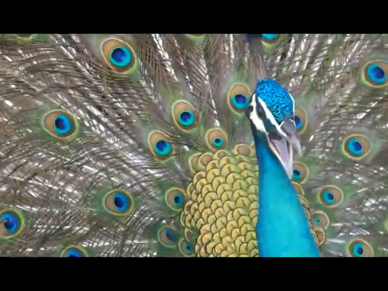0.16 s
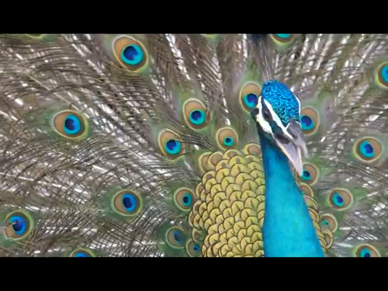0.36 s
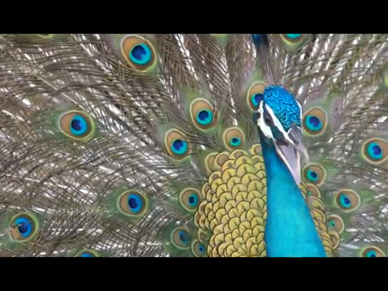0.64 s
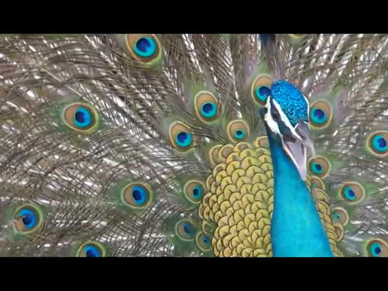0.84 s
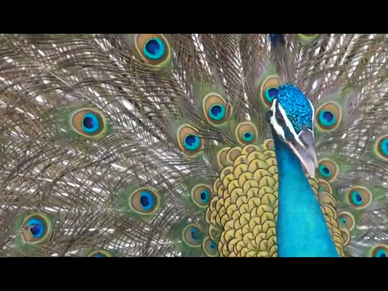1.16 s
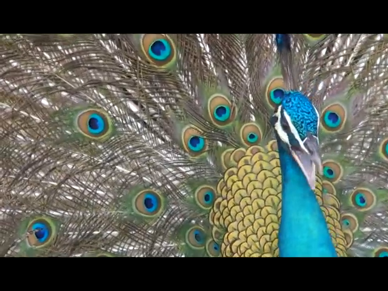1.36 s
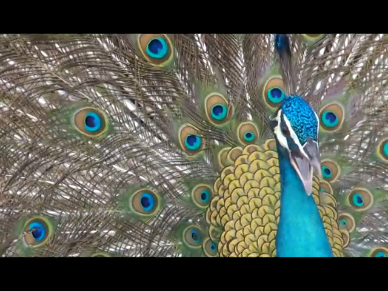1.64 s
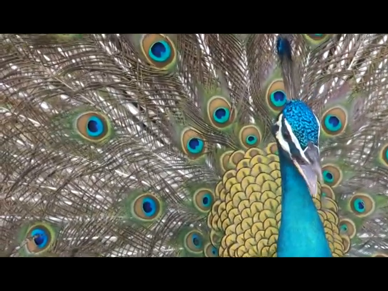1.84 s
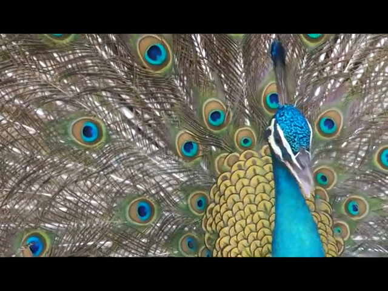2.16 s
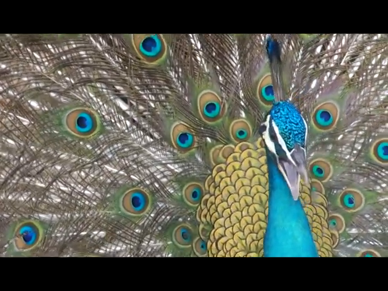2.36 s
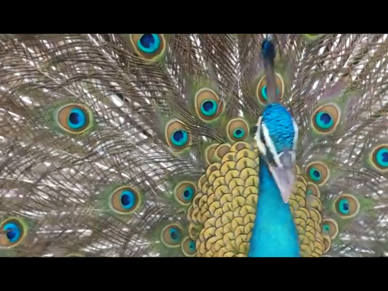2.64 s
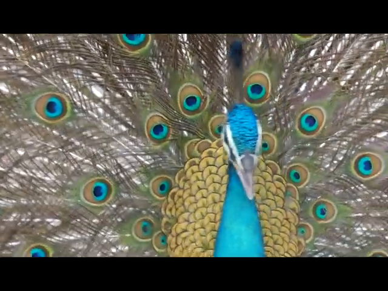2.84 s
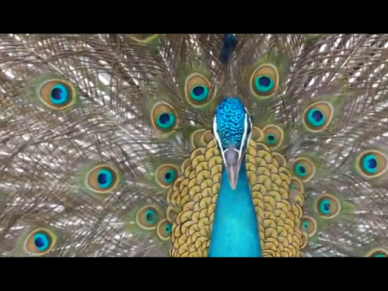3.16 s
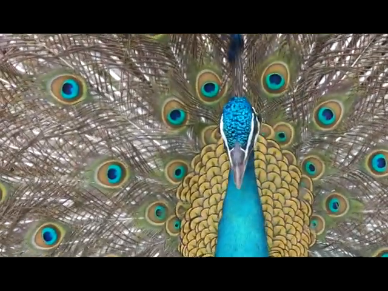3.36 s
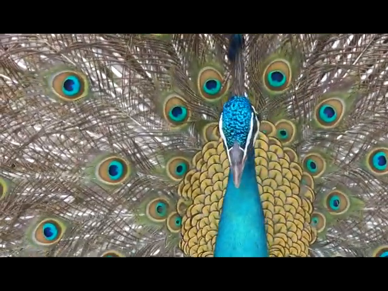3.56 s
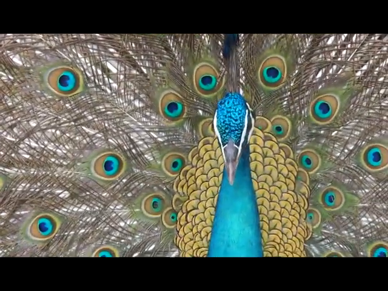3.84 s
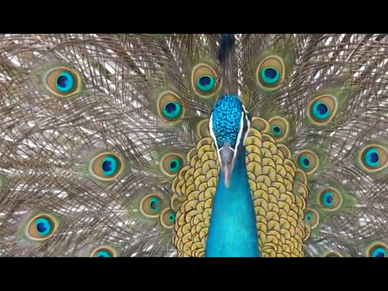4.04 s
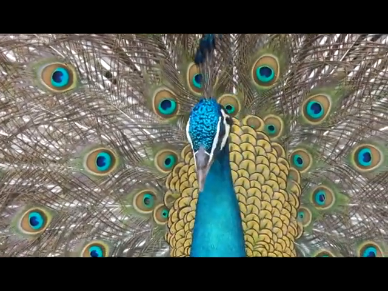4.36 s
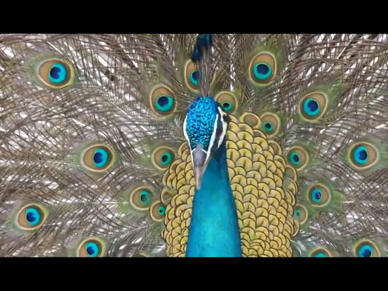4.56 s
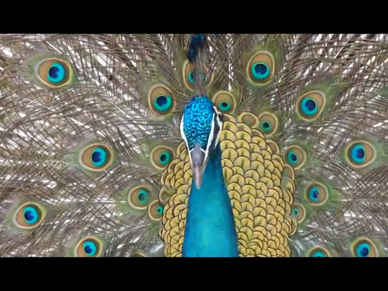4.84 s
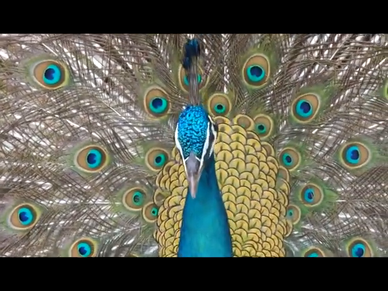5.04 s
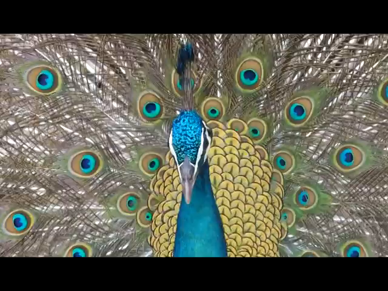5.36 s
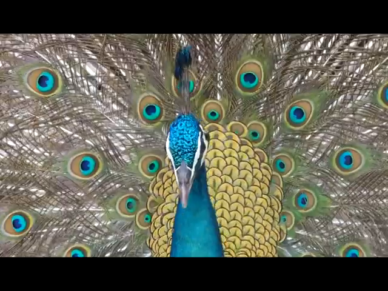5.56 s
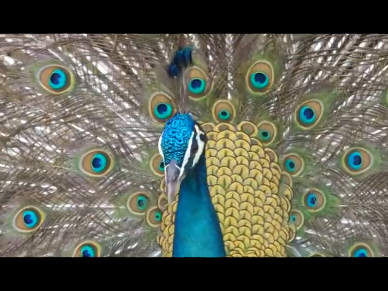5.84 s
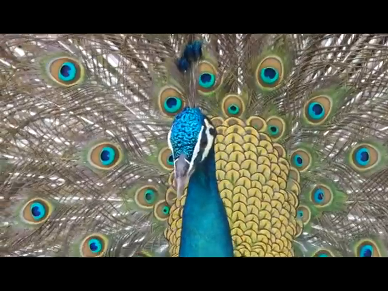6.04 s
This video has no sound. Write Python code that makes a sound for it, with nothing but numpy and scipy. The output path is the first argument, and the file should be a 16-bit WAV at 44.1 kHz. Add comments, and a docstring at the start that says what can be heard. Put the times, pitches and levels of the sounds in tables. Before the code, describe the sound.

Four piercing rising-and-sagging peacock cries at close range, followed by swelling background hiss, low wind rumble and scattered dry clicks.

```python
"""A displaying peacock gives four loud arching calls close to a camera in a covered aviary.
Each call is a stack of gliding overtones plus puffs of noise; a thin whistle leads into the last one.
A few dry clicks of decaying noise follow. Lumpy low noise is air buffeting the microphone, over a steady hiss.
The camera's gain control pushes the background down while he calls and lets it swell back afterwards."""
import sys
import numpy as np
from scipy import signal
from scipy.fft import rfft, irfft
from scipy.io import wavfile
from scipy.ndimage import uniform_filter1d, minimum_filter1d

SR = 44100
rng = np.random.default_rng(int(sys.argv[2]) if len(sys.argv) > 2 else 0)


def store_pcm(level_fs):
    """Save levels as 16-bit WAV."""
    pcm = np.round(np.clip(level_fs, -1, 1) * 32767).astype(np.int16)
    wavfile.write(sys.argv[1], SR, np.atleast_2d(pcm).T)


N = 273420
TIME = np.arange(N) / SR  # s
BINS = np.fft.rfftfreq(N, 1 / SR)  # Hz


def amp(db):
    """Turns decibels into a gain."""
    return 10 ** (np.asarray(db) / 20)


def unit(x):
    """Scales a sound to an average (rms) level of 1."""
    return x / np.sqrt(np.mean(x ** 2) + 1e-20)


def read(points, hz):
    """Reads a spectrum curve, with frequency on a log axis."""
    f, value = np.transpose(points)
    return np.interp(np.log(hz + 1), np.log(f + 1), value)


def follow(rows, t):
    """Reads every column of a curve at the positions t."""
    s, *columns = np.transpose(rows)
    return [np.interp(t, s, c) for c in columns]


def add(mix, s, sound):
    """Lays a sound into the mix at s seconds."""
    part = mix[max(round(s * SR), 0):][:len(sound)]
    part += sound[:len(part)]


def wander(size, rate_hz):
    """Slow random drift of rms 1, with most of its motion below about rate_hz."""
    span = max(size, 2 * SR)
    hz = np.fft.rfftfreq(span, 1 / SR)
    slow = rfft(rng.standard_normal(span)) / (1 + (hz / rate_hz) ** 2)
    return unit(irfft(slow, span))[:size]


def band(x, low_hz, high_hz):
    """Keeps one band of a sound, at rms 1."""
    sos = signal.butter(2, [low_hz, high_hz], "band", fs=SR, output="sos")
    return unit(signal.sosfilt(sos, x))


def ports(spectra, phase, balance):
    """Gives spectra the phase and level differences between the two microphone ports."""
    lean = amp(read(balance, BINS) / 2)
    turn = np.exp(1j * read(phase, BINS) / 2)
    gains = np.array([lean * turn, turn.conj() / lean])
    even_power = np.sqrt((lean ** 2 + lean ** -2) / 2)
    return irfft(spectra * gains / even_power, N)


def peacock():
    """The bird's voice: four calls in a row, and the thin whistle before the last."""
    # the calls: (start [s], length [s], top pitch [Hz], downward drift over the call [Hz], level [dB],
    # extra ring near the top [dB], treble lost as the beak shuts [dB])
    cries = [(-0.085, 0.525, 653, -4, -0.5, 15.5, -1), (0.638, 0.4838, 652.6, 0, -0.5, 7, -1),
             (1.374, 0.5576, 656.4, -5, -0.06, -0.5, 1.5), (2.225, 0.628, 658.1, 16, -0.15, -1.5, 18.5)]
    out = np.zeros(N)
    for cry in cries:
        add(out, *call(*cry))
    add(out, *whistle())
    return out


def call(start, length, top_hz, drift_hz, call_db, extra_ring_db, shut_db, jitter=0.00071, waver=0.00068,
         rasp_jitter=0.016, rasp_below_hz=582, droop_hz=42, shimmer_db=3.5, flutter_db=0.58,
         attack=.014, release=0.015, partials=20):
    """One cry: overtones arch through the throat's peaks and turn hoarse at both ends, where the pitch sags."""
    # a quick climb and a long sag, shared by all calls: (share of the call [0-1], drop below the top pitch [Hz])
    arch = [(0, 111.5), (.025, 77), (.08, 46.5), (.17, 18.5), (.27, 4.5), (.4, -1.5), (.53, 4), (.63, 19.5),
            (.88, 55), (.96, 75), (1, 100)]
    # he pushes hardest on the climb and eases off at the end: (share of the call [0-1], level [dB])
    effort = [(0, 4), (.03, 3.5), (.11, 2), (.22, 1.5), (.4, 0), (.88, -0.5), (.96, -4.5), (1, -2.5)]
    # weak overtones: (share of the call [0-1], hollow near 4 kHz [dB], ring near 6.5 kHz [dB], sheen above [dB])
    overtones = [(0, -39.5, -28.5, -40.5), (.06, -32.5, -35.5, -37.5), (.17, -29.5, -28.5, -34.5),
                 (.27, -32, -30.5, -28), (.47, -36, -35, -28.5), (.6, -35, -38.5, -32.5),
                 (.69, -32.5, -40, -42), (.82, -34.5, -33.5, -31.5), (.95, -42, -37.5, -36),
                 (1, -47, -36, -43)]
    # fixed peaks and dips of the throat and its surroundings: (frequency [Hz], amplitude [dB])
    throat = [(550, -25), (603, -19), (635, -24), (660, -21.5), (1120, -18), (1225, -13.5), (1275, -17),
              (1315, -25.5), (1640, -22), (1735, -19), (1805, -23), (1832, -31), (1868, -17), (1893, -12),
              (1919, -16.5), (1942, -11), (1975, -9), (2230, -16), (2350, -17.5), (2420, -10.5),
              (2495, -14.5), (2555, -33), (2620, -27)]
    top_at = .4  # share of the call at which the drift is zero
    ring_at, ring_span = 0.36, 0.23  # where the extra ring peaks and how far it spreads, shares of the call
    shut_at, shut_span = 0.782, 0.16  # when the beak starts to shut and how long it takes, shares of the call

    t = np.arange(max(start - attack, 0), start + length + release, 1 / SR)
    share = (t - start) / length
    hz = top_hz - follow(arch, share)[0] - drift_hz * (share - top_at)
    hz = hz * (1 + waver * wander(len(t), 40))
    ending = np.clip((t - start - length + release) / (2 * release), 0, 1)
    hz = hz - droop_hz * ending  # the pressure collapses

    # the four strong partials swell and fade as they glide through the throat's peaks
    effort_db, = follow(effort, share)
    muffle_db = shut_db * np.clip((share - shut_at) / shut_span, 0, 1)
    strong_db = [read(throat, k * hz) + effort_db for k in range(1, 4)]
    strong_db.append(read(throat, 4 * hz) - muffle_db)

    hollow_db, ring_db, sheen_db = follow(overtones, share)
    hollow_db, sheen_db = hollow_db - muffle_db, sheen_db - muffle_db
    ringing_db = extra_ring_db * np.exp(-((share - ring_at) / ring_span) ** 2)
    ring_db = ring_db + ringing_db

    # a low pitch is slack, and a lower one still is hoarse; both make the pitch shake
    hoarse = 1 / (1 + np.exp((hz - rasp_below_hz) / 9))
    slack = np.clip((650 - hz) / 40, 0, 1)
    wobble = jitter * (1 + slack) * wander(len(t), 160) + rasp_jitter * hoarse * wander(len(t), 310)
    phase = 2 * np.pi * np.cumsum(hz * (1 + wobble)) / SR

    out = np.zeros(len(t))
    for k in range(1, partials + 1):
        if k <= len(strong_db):
            level_db = strong_db[k - 1] + flutter_db * wander(len(t), 26)
        else:
            level_db = overtone_level(k * hz, hollow_db, ring_db, sheen_db)
            level_db = level_db + shimmer_db * wander(len(t), 18) - 4 * hoarse  # hoarseness weakens them
        out += amp(level_db) * np.cos(k * phase + rng.uniform(0, 2 * np.pi))
    out += rush(t - start, phase, slack, hoarse, hollow_db, ring_db, sheen_db, ringing_db, strong_db[3])

    fade_in = np.clip((t - t[0]) / (max(start, .004) - t[0]), 0, 1)
    fade_out = np.clip((t[-1] - t) / (2 * release), 0, 1)
    return t[0], amp(call_db) * out * (fade_in * fade_out) ** 2


def overtone_level(f, hollow_db, ring_db, sheen_db):
    """Weak overtones pass through three zones as they rise: the hollow, the ring, then the sheen."""
    # weights within each zone, all three tables: (frequency [Hz], weight [dB])
    hollow_weight, ring_weight, sheen_weight = [(2750, 8.5), (3050, -4.5), (3300, -2), (3700, -10.5),
                                                (4300, -9.5), (4600, -15.5), (5000, -11)], [(5000, 21), (5250, -12), (5550, -8),
                                                                (5880, -2.5), (6400, -13), (7150, -9.5),
                                                                (7600, -13)], [(7600, -12), (8500, -10),
                                                                              (9200, -12.5), (9800, -15),
                                                                              (10450, -13), (11100, -26),
                                                                              (11700, -51)]
    in_ring = np.clip((f - 4900) / 400, 0, 1)
    in_sheen = np.clip((f - 7400) / 400, 0, 1)
    level_db = (1 - in_ring) * (hollow_db + read(hollow_weight, f)) + in_ring * (ring_db + read(ring_weight, f))
    return (1 - in_sheen) * level_db + in_sheen * (sheen_db + read(sheen_weight, f))


def rush(since_start, phase, slack, hoarse, hollow_db, ring_db, sheen_db, ringing_db, fourth_db,
         rush_db=-16.5, rush_rise_db=3, grate_db=7, grate_s=.055, hollow_rush_db=-15, rasp_db=-16):
    """Air rushes through the beak in puffs, once a cycle, least at the taut top of the call."""
    puffs = (1 + 0.4 * np.cos(phase)) * rng.standard_normal(len(phase))
    onset_db = grate_db * np.exp(-np.maximum(since_start, 0) / grate_s)  # the onset grates
    loose_db = rush_rise_db * slack + 5 * hoarse + onset_db
    out = amp((ring_db + sheen_db) / 2 + rush_db + loose_db) * band(puffs, 5000, 10000)
    out += amp(hollow_db + hollow_rush_db + loose_db + .5 * ringing_db) * band(puffs, 2700, 4330)
    out += amp(fourth_db + rasp_db) * hoarse * band(puffs, 1490, 2780)
    return out


def whistle():
    """A thin whistle leads into the last call: one sine with a gliding pitch."""
    # its path, level before the bird's closeness gain: (time [s], pitch [Hz], amplitude [dB])
    path = [(2.111, 1690, -51.5), (2.135, 1650, -52), (2.16, 1610, -45), (2.194, 1644, -49),
            (2.215, 1640, -44), (2.225, 1650, -58)]
    t = np.arange(path[0][0], path[-1][0], 1 / SR)
    hz, db = follow(path, t)
    return t[0], amp(db) * np.sin(2 * np.pi * np.cumsum(hz) / SR)


def scatter(x, first, decay, above_hz, size=4096):
    """A quick spray of echoes from nearby things, different at each port, above a given frequency."""
    t = TIME[:size]
    taps = rng.standard_normal((2, size)) * (t > first) * np.exp(-t / decay)
    high = signal.butter(3, above_hz, "high", fs=SR, output="sos")
    taps = signal.sosfilt(high, taps / np.linalg.norm(taps[0]))
    return signal.fftconvolve(x[None], taps, axes=1)[:, :N]


def clicks(snap=0.45, size=4096):
    """Each dry click is a sharp snap followed by a quickly dying crackle."""
    # the clicks, level before an overall 3 dB lift:
    # (time [s], level [dB], decay time [s], treble tilt [dB per octave])
    click_rows = [(4.448, -38, 0.0065, 4), (4.6694, -26.5, 0.0033, 1), (4.6724, -23.5, 0.005, 1.5),
                  (4.7945, -20.5, 0.0078, -0.5), (4.798, -30, 0.0044, 3), (4.93, -34, 0.011, 1.5),
                  (5.114, -34, .005, 9), (5.504, -23, 0.013, 1), (5.528, -37.5, 0.049, 3)]
    # shared tone of the clicks: (frequency [Hz], density [dB per Hz])
    click_tone = [(300, -40), (800, 4.5), (1300, 1), (2200, 6.5), (2600, -3), (3200, -15), (4600, -14.5),
                  (6500, -5.5), (9000, -10.5), (11500, -24)]
    out, t, hz = np.zeros(N), np.arange(size) / SR, np.fft.rfftfreq(size, 1 / SR)
    lead = size // 16  # the snap sits a little way in
    for s, db, length, tilt_db in click_rows:
        colour = unit(amp(read(click_tone, hz) + tilt_db * np.log2((hz + 100) / 3000)))
        crackle = rng.standard_normal(size) * np.exp(-t / length)
        crackle[0] += snap * np.sqrt(length * SR / 2)
        click = irfft(rfft(np.roll(crackle, lead)) * colour)
        add(out, s - lead / SR, amp(db + 3.0) * click)
    return out


def buffets(lumps_db=-1.0, lumps_hz=9, gust_rise_s=0.04):
    """Low lumps of moving air at the microphone: gusts that rise quickly and fade, over an uneven breeze."""
    # gusts, before an overall 7 dB cut: (peak time [s], peak level [dB], fading time [s])
    gusts = [(.02, -19.5, 0.055), (1.38, -16.5, 0.055), (1.982, -21, .12), (2.21, -22, 0.054),
             (2.97, -26.5, 0.062), (3.248, -14.5, 0.11), (3.81, -18, 0.033), (3.96, -17, .05),
             (4.24, -24.5, .02), (4.342, -21, 0.028), (4.44, -22, 0.063), (4.71, -15.5, 0.11),
             (5.74, -17.5, 0.083), (6.01, -17.5, 0.03)]
    # light air between gusts, before the same cut: (time [s], level [dB])
    breeze = [(0, -29), (2.8, -32.5), (3.3, -28.5), (6.2, -25)]
    # tone of the moving air: (frequency [Hz], density [dB per Hz])
    buffet_tone = [(20, -31), (35, -49), (55, -20), (90, -15), (130, -9.5), (180, -2.5), (225, 0.5),
                   (320, -3.5), (500, -11), (800, -20), (1500, -31.5), (4000, -84)]
    power = amp(follow(breeze, TIME)[0] + lumps_db * wander(N, lumps_hz)) ** 2
    for s, db, fade in gusts:
        width = np.where(TIME < s, gust_rise_s, fade)
        gust = amp(db) * np.exp(-((TIME - s) / width) ** 2 / 2)
        power = power + gust ** 2
    return amp(-7.0) * np.sqrt(power) * air_noise(buffet_tone)


def thumps(rise=0.0043, size=2000):
    """A sudden push of air swings the microphone for a few cycles: a low sine that rises fast and dies away."""
    # the sharpest knocks: (time [s], peak of the envelope [dB], frequency [Hz])
    knocks = [(2.196, -20, 161), (3.241, -14, 191), (5.74, -13.5, 190)]
    out, t = np.zeros(N), np.arange(size) / SR
    for s, db, hz in knocks:
        envelope = t / rise * np.exp(1 - t / rise)
        add(out, s, amp(db) * envelope * np.sin(2 * np.pi * hz * t))
    return out


def hiss(level_db=-31.0):
    """The steady outdoor background: coloured noise at one level."""
    # tone of the hiss: (frequency [Hz], density [dB per Hz])
    hiss_tone = [(30, -46), (100, -2.5), (220, -13), (600, -3), (950, 1), (1200, -1), (1500, -5),
                 (2200, -7.5), (2550, -16), (2900, -26), (4600, -25.5), (5800, -17), (9500, -20.5),
                 (11500, -35)]
    return amp(level_db) * air_noise(hiss_tone)


def air_noise(colour):
    """Coloured noise of rms 1, partly alike at the two microphone ports."""
    # how alike the ports are: (frequency [Hz], coherence [0-1])
    likeness = [(100, 0.92), (300, 1), (600, 1), (1200, 0.95), (2500, 0.34), (5300, 0.74), (11000, 0.13)]
    # (frequency [Hz], phase by which left leads [rad])
    air_phase = [(60, 0), (340, -.4), (1120, -2.4), (1720, -3.4), (2410, -2.1), (2930, -2.8), (5600, -3.3),
                 (7240, -4.4), (9470, -5.3), (11000, -5.5)]
    # (frequency [Hz], left minus right [dB])
    air_balance = [(60, 1.5), (110, 0.5), (190, 0.5), (340, 2.5), (610, 4.5), (1090, 0.5), (1950, -3.5),
                   (3480, -7), (6220, -3.5), (11100, -17.5)]
    left, other = rfft(rng.standard_normal((2, N)))
    same = np.clip(read(likeness, BINS), 0, 1)
    pair = np.array([left, same * left + np.sqrt(1 - same ** 2) * other])
    return unit(ports(pair * amp(read(colour, BINS)), air_phase, air_balance))


def aviary(x, first=0.0023):
    """Thin, scattered reflections from roof and walls; the high treble dies fast."""
    # how long the echoes last: (frequency [Hz], time to fall by 60 dB [s])
    fade_times = [(200, 0.078), (2000, 0.52), (5000, 0.44), (11000, 0.026)]
    sparse = rng.random((2, SR)) < 2000 / SR  # about 2000 echoes a second
    taps = rng.standard_normal((2, SR)) * sparse * (TIME[:SR] > first)
    hz, t, z = signal.stft(taps, SR, nperseg=256)
    decay = amp(-60 * t / read(fade_times, hz)[:, None])
    tail = signal.istft(z * decay, SR, nperseg=256)[1]
    return signal.fftconvolve(x[None], tail / np.linalg.norm(tail[0]), axes=1)[:, :N]


def scene(closeness_db=13, fan_db=-10, ground_db=-20, room_db=-23):
    """The bird is very near; his spread fan scatters the treble, ground and walls give a short tail."""
    # near sounds at the two ports: (frequency [Hz], phase by which left leads [rad])
    bird_phase = [(100, 0), (620, -.45), (1250, -1.75), (1800, -.4), (1970, -.9), (2450, -1.9),
                  (3300, -2.2), (4500, -2.9), (6000, -3.2), (7200, -4.4), (9300, -6.2), (11000, -6.5)]
    # (frequency [Hz], left minus right [dB])
    bird_balance = [(100, -5), (620, 6.5), (1200, -0.5), (1780, -13.5), (1960, -1), (2400, 1), (2650, -6),
                    (6500, -7.5), (9000, -9.5), (11000, -27)]
    near = amp(closeness_db) * peacock() + clicks()
    direct = ports(rfft(near), bird_phase, bird_balance)
    fan = amp(fan_db) * scatter(near, first=.001, decay=.006, above_hz=3930)
    ground = amp(ground_db) * scatter(near, first=0.019, decay=0.02, above_hz=2400)
    room = amp(room_db) * aviary(near)
    air = buffets() + thumps() + hiss()
    return direct + fan + ground + room + air


def record(dry, threshold_db=-12, depth_db=13, recovery_db=33, hold=0.1, edge_hz=11600):
    """Gain control that holds briefly and recovers slowly, the camera's notches, then the band limit."""
    # the camera's narrow stop bands: (frequency [Hz], width [Hz])
    stop_bands = [(3020, 114), (4010, 235), (5000, 300)]
    power_db = 10 * np.log10(abs(uniform_filter1d((dry ** 2).mean(0), size=400)) + 1e-12)
    over_db = np.clip(2 * (power_db - threshold_db), 0, depth_db)
    # keep the strongest cut of the last hold seconds
    span = 2 * int(hold * SR / 2) + 1
    held_db = -minimum_filter1d(-over_db, span, origin=span // 2)
    # then let go of it at recovery_db per second
    fall = TIME * recovery_db
    duck_db = uniform_filter1d(np.maximum.accumulate(held_db + fall) - fall, size=200)
    notches = np.prod([1j * (BINS - hz) / (width + 1j * (BINS - hz)) for hz, width in stop_bands], axis=0)
    coloured = irfft(rfft(dry * amp(-duck_db)) * notches, N)
    low_pass = signal.firwin(255, edge_hz, window=("kaiser", 8), fs=SR)
    return signal.oaconvolve(coloured, low_pass[None], "same")


dry = scene()
out = record(dry)
store_pcm(out)
```